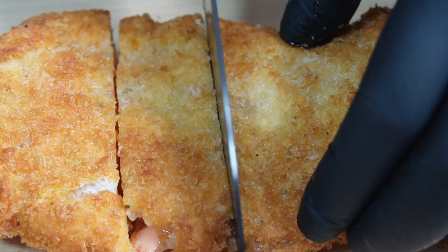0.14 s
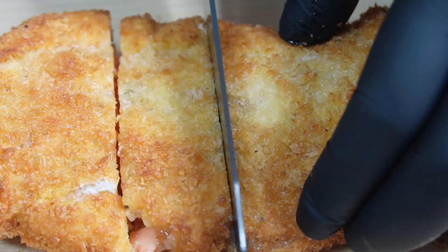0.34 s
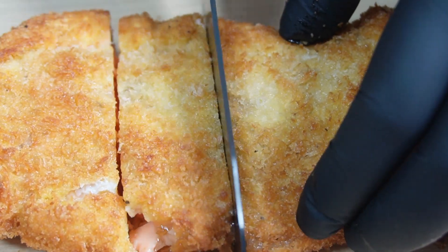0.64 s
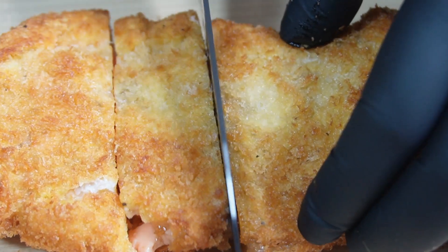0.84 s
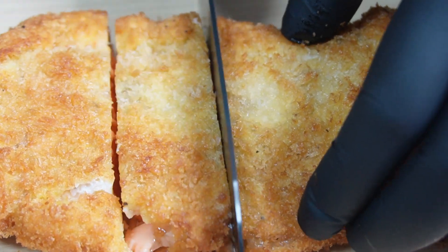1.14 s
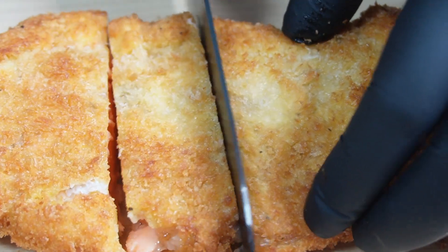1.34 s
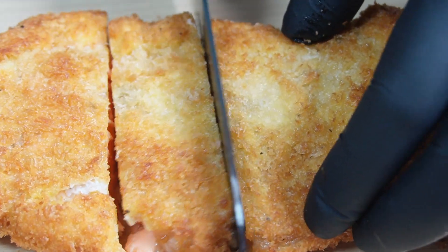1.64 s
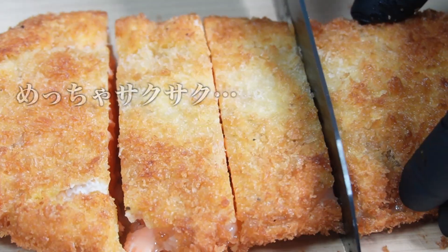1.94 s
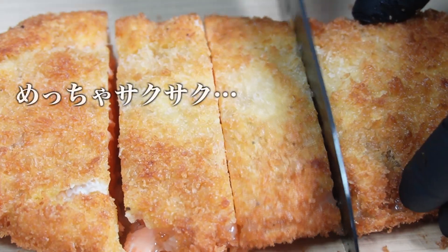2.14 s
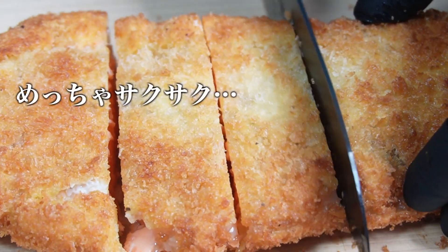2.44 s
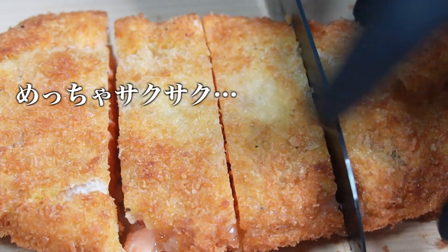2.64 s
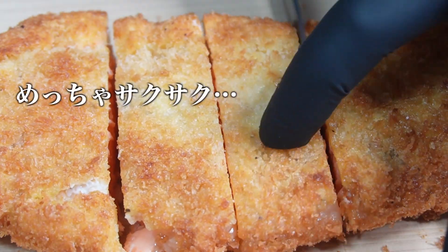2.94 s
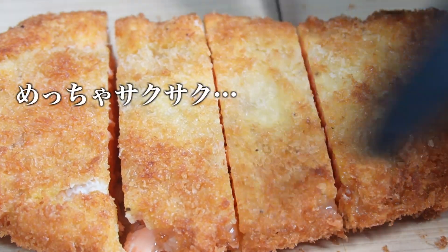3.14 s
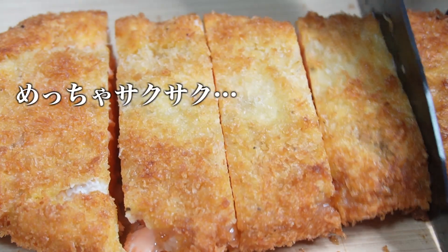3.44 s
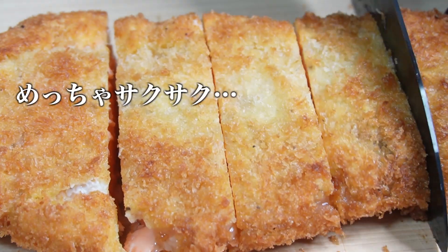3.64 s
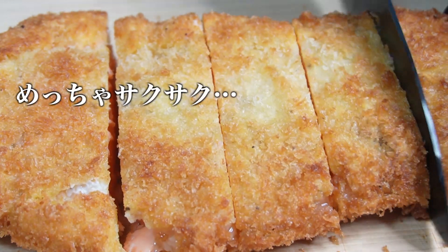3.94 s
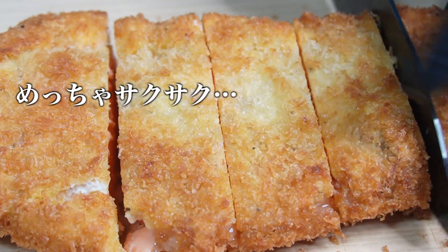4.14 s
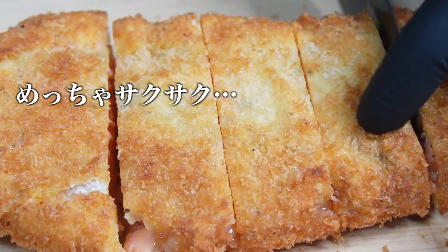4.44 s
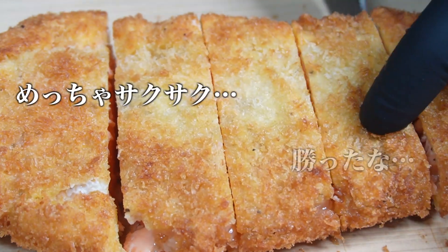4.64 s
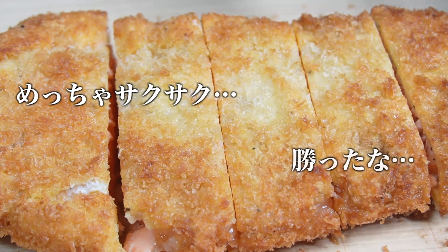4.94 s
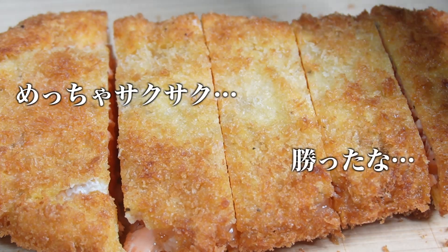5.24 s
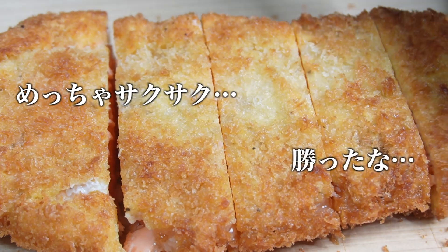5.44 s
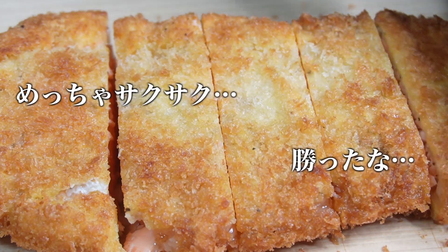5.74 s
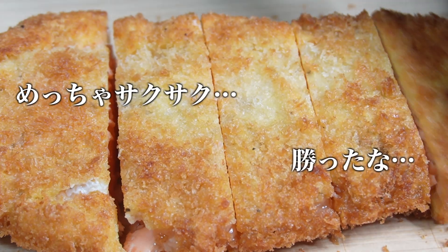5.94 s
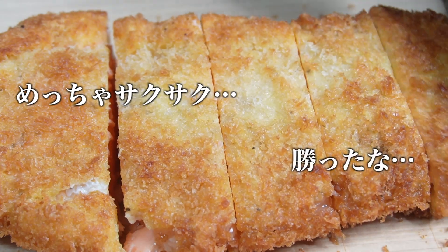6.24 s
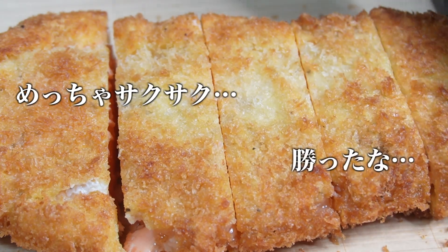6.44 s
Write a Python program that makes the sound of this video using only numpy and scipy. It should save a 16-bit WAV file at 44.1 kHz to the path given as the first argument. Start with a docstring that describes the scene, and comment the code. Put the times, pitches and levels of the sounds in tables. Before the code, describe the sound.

Very close in a quiet kitchen, a knife saws through a crunchy fried cutlet. Uneven strokes burst into dense crumb crackle with sharp flake snaps and light knocks on the board. The blade grates as it is drawn out, a piece slides softly, then more crunches follow, another long scrape, a soft slide, and brighter, drier crackling cuts at the end over faint low room noise.

```python
"""In a quiet kitchen, a knife saws three slices off a crisp breaded cutlet on a cutting board, close by.
Each stroke is a swarm of random crumb cracks, with short damped tones for the loud snaps of the crust.
Between bites the blade glides on smooth grit noise; its landings ring the board's own tones. The drawn
blade grates over the board, the pieces slide with soft rubbing noise, and the crust crunches again.
A short room answer and steady background noise lie around it all."""
import sys
import numpy as np
from scipy import signal
from scipy.fft import rfft, irfft, next_fast_len
from scipy.io import wavfile
from scipy.ndimage import map_coordinates

SR = 44100
rng = np.random.default_rng(int(sys.argv[2]) if len(sys.argv) > 2 else 0)


def master(y):
    """Save y as 16-bit WAV."""
    cut = np.clip(np.atleast_2d(y).T, -1, 1)
    pcm = np.round(cut * 32767)  # scale
    wavfile.write(sys.argv[1], SR, pcm.astype(np.int16))


N = 290619  # length of the scene in samples

# In bites and pulls, body is the dull part of the sound against its crisp part.
# the blade bites through the crust; time is when the crust gives way:
# (time [s], rise [s], hold [s], fall [s], crunch level [dB], body [dB])
BITES = [ (.175, 0.01, 0.0036, 0.015, -42.5, -3), (.222, 0.074, 0.1, 0.026, -37.5, -3),
         (.555, .003, .003, 0.028, -49, -8), (.622, 0.057, 0.03, 0.041, -32, -2.5),
         (.975, 0.13, 0.041, 0.053, -32, 1), (1.151, 0.08, 0.06, 0.041, -37, -2),
         (1.3, 0.13, 0.051, 0.062, -45, -5.5), (1.615, 0.035, 0.045, 0.02, -45, 0),
         (1.85, 0.11, 0.044, 0.065, -36, -4.5), (2.156, 0.03, 0.038, 0.056, -31, -4.5),
         (2.322, 0.023, 0.023, 0.0097, -52, 1), (2.392, 0.039, 0.013, 0.057, -40, -1),
         (2.523, 0.031, 0.022, 0.043, -41, -7.5), (2.66, .005, 0.0042, 0.014, -53.5, 8.5),
         (3.32, .016, 0.0085, 0.034, -36.5, -1), (3.34, 0.018, 0.052, 0.057, -42, -3),
         (3.48, 0.24, 0.068, 0.055, -48.5, -1.5), (3.585, 0.034, 0.061, 0.033, -42, -1),
         (3.635, 0.032, .035, .015, -40.5, -7), (3.914, 0.034, .036, 0.15, -31, -3),
         (4.034, .06, 0.033, .012, -36.5, -20), (4.14, .004, 0.009, 0.028, -51, 3),
         (4.177, 0.014, 0.019, 0.027, -53.5, 4.5)]
# shallower bites at the dry end of the cutlet: same columns
DRY_BITES = [ (5.335, 0.02, 0.0035, 0.045, -48.5, -8), (5.43, 0.17, 0.039, 0.012, -52, -3.5),
             (5.512, 0.0086, 0.013, 0.037, -44.5, -5), (5.56, 0.12, 0.17, 0.04, -42.5, -9.5),
             (5.7, 0.026, 0.061, 0.02, -43.5, -4), (5.795, .02, 0.047, 0.064, -49, -8),
             (5.978, 0.081, 0.051, 0.062, -38.5, -9), (6.115, .04, 0.037, 0.11, -50.5, -10),
             (6.281, 0.066, 0.018, 0.038, -34, -7), (6.4, .08, 0.032, 0.054, -56.5, -2.5),
             (6.548, 0.048, 0.033, .05, -39, -3.5)]
# between bites the blade leans on the crust, which keeps crackling: (start [s], length [s], level [dB])
LEANS = [(0, 0.12, -55), (.34, 0.15, -58), (0.563, 0.84, -56.5), (1.508, 0.074, -64.5), (1.572, 0.21, -53),
         (1.95, 0.43, -55.5), (2.47, 0.166, -55), (2.679, 0.084, -49.5), (3.686, 0.13, -56),
         (3.856, 0.16, -61), (4.22, 0.18, -53.5)]
# the same at the dry end: same columns
DRY_LEANS = [(5.34, 0.12, -55.5), (5.52, 0.51, -57), (6.22, .21, -61.5), (6.492, .09, -51.5)]
# the blade glides in the cut without biting: (start [s], end [s], level [dB], blade ring [dB])
GLIDES = [(0, 0.114, -48, -29), (0.382, .535, -51.5, 7), (0.435, .452, -52, 22), (0.763, 0.868, -49.5, 16),
          (2.907, 2.943, -43, 15), (4.422, 4.516, -44.5, 12)]
# large flakes of crust snap: (time [s], peak level [dB], pitch [Hz])
FLAKES = [(0.0179, -26, 6400), (0.1759, -25, 3700), (0.2544, -17, 6000), (0.6247, -17, 5600),
          (0.6962, -26, 5500), (1.0092, -13, 4000), (1.0472, -20, 6100), (1.114, -28, 3100),
          (1.1523, -20, 5100), (1.1637, -17, 4600), (1.1823, -15, 4500), (1.1991, -19, 3900),
          (1.2163, -18, 4100), (1.302, -22, 5200), (1.322, -21, 5000), (1.3523, -26, 4600),
          (1.615, -24, 6200), (1.6541, -24, 4800), (1.9421, -24, 5600), (2.1209, -26, 3300),
          (2.1336, -21, 4500), (2.144, -20, 4400), (2.321, -28, 6000), (2.3936, -22, 3000),
          (2.5227, -20, 6300), (2.6607, -26, 4500), (2.7165, -27, 5300), (2.7408, -26, 6300),
          (2.7871, -20, 4900), (2.8629, -24, 5700), (3.0818, -25, 5700), (3.312, -23, 4500),
          (3.3213, -18, 4400), (3.4898, -24, 3900), (3.6369, -19, 4900), (3.6715, -23, 4900),
          (3.8886, -26, 4700), (3.9112, -15, 3800), (3.9377, -12, 4700), (3.9967, -21, 4400),
          (4.0071, -19, 5900), (4.1397, -26, 5100), (4.1491, -23, 4300), (4.1935, -26, 3200),
          (4.4119, -23, 4000), (4.7532, -20, 5500), (4.7644, -22, 5600), (5.3351, -27, 5100),
          (5.519, -20, 4400), (5.6993, -13, 4500), (5.7958, -26, 5700), (5.9649, -9, 5600),
          (5.981, -15, 6100), (6.0184, -18, 5700), (6.0301, -20, 4600), (6.1176, -26, 4000),
          (6.282, -14, 6600), (6.5488, -17, 4500), (6.5623, -15, 4300)]
# the edge meets the board; all levels are later shifted together:
# (time [s], level [dB], centre of the knock [Hz])
LANDINGS = [(0.184, -32.5, 540), (0.374, -35, 590), (2.525, -45, 420), (2.716, -45, 460),
            (3.082, -38.5, 324), (3.32, -33.5, 546), (4.762, -38.5, 324), (6.298, -30.5, 710)]
# the blade drawn out along the board; time is when it reaches full speed; the body is later trimmed:
# (time [s], rise [s], hold [s], fall [s], scrape level [dB], body [dB])
PULLS = [(2.8, 0.046, 0.27, 0.12, -45.5, -5), (3.168, 0.02, 0.0073, 0.027, -48, -12),
         (4.43, 0.36, 0.21, 0.34, -45, -5.5), (4.76, 0.069, 0.057, 0.064, -50, 0),
         (4.87, 0.025, 0.0065, .05, -48, -30)]
# how firmly the drawn edge bears on the board: (time [s], contact [1 = firm])
CONTACT = [(2.78, 0.17), (2.95, 0.42), (3.07, 0.51), (3.139, 0.24), (4.36, 0.074), (4.469, 0.7),
           (4.6, 0.79), (4.82, 0.44), (4.89, 0.16)]
# a cut piece slides; time is when it reaches full speed:
# (time [s], rise [s], hold [s], fall [s], level [dB])
SLIDES = [(3.198, .05, 0.031, .3, -61), (4.928, .1, 0.071, .3, -66), (5.119, 0.21, 0.05, 0.23, -54)]

# tones of the board, weighted afresh for each knock: (pitch [Hz], level [dB], time to fall 60 dB [s])
BOARD_MODES = [(137, -12, .075), (238, 14, 0.032), (394, 23, 0.012), (514, -30, 0.068), (540, 9.5, 0.051),
               (710, 15.5, 0.056), (884, 27.5, 0.041)]
# resonances of the blade inside the cutlet: (pitch [Hz], width [Hz], level [dB])
BLADE_INSIDE = [(1143, 320, 11), (1760, 136, 3.5), (2200, 85, 0.5), (3916, 52, 4.5), (5070, 500, -10)]
# the flat of the blade rubbed by the cut face; the ring of each glide is added to the level:
# (pitch [Hz], width [Hz], level [dB])
BLADE_FACE = [(1930, 160, -3), (2240, 82, 0)]
# resonances of the blade against the board: (pitch [Hz], width [Hz], level [dB])
BLADE_ON_BOARD = [(745, 43, -17), (818, 56, 19), (1220, 27, -0.5), (1660, 46, 8.5), (2295, 35, -7.5)]

# Tone colours, giving shape but not loudness.
# crumbs breaking: (frequency [Hz], level [dB])
CRUMBS = [(60, -28), (200, -13), (430, -22.5), (650, -4.5), (1100, -12.5), (1550, -7.5), (2100, 1.5),
          (3300, 2.5), (4500, 4), (7000, 5), (10000, -3.5), (16000, -21.5)]
# crumbs at the dry end: (frequency [Hz], level [dB])
DRY_END = [(60, -30.5), (200, -10), (500, -22.5), (720, -8), (1400, -9.5), (2100, -3.5), (4000, -0.5),
           (6500, -3), (10000, -9.5), (16000, -26)]
# crumbs grating under the drawn blade: (frequency [Hz], level [dB])
GRATING = [(150, -69), (450, -27), (700, -7), (1400, -8.5), (2300, -4), (3500, -2.5), (6000, 3),
           (8000, -1.5), (11000, -11.5), (16000, -26)]
# smooth rubbing of blade or piece: (frequency [Hz], level [dB])
RUBBING = [(500, -26), (1500, -18), (2400, -8), (4000, -6.5), (6200, -8), (8000, -15.5), (16000, -33)]
# snapping flakes: (frequency [Hz], level [dB])
FLAKE_TONE = [(100, -34), (400, -9), (900, -9), (2000, -5.5), (6500, -4), (9500, -9), (12000, -11.5),
              (16000, -10.5)]
# background noise of the room: (frequency [Hz], level [dB])
BACKGROUND = [(20, -47), (50, -17), (90, -12), (130, -3.5), (168, 0), (200, 0), (255, 1), (400, -3.5),
              (600, -7.5), (1300, -16), (5000, -13), (16000, -32)]
# how long the room answers: (frequency [Hz], time to fall 60 dB [s])
ROOM_T60 = [(200, 0.9), (2000, 0.12), (10000, 0.15)]

TOP_HZ = 16000  # nothing is kept from here up
EDGE_DB = 22.5  # a stroke swells by this much over its rise and dies by this much over its fall
LEAN_RISE_S, LEAN_FALL_S, LEAN_BODY_DB = 0.012, 0.062, -7.5
# small flakes drop off at random during a lean, and peak well over its crackle
CHIPS_PER_S, CHIP_OVER_DB, CHIP_SPREAD_DB = 6.9, 20.5, 7
CHIP_HZ, CHIP_OCTAVES = 5830, 0.31  # middle pitch and its random spread


def amp(db):
    """Turn decibels into a gain."""
    return 10 ** (np.asarray(db) / 20)


def unit(x):
    """Scale a sound to an average (rms) strength of 1."""
    return x / np.sqrt(np.mean(x ** 2) + 1e-20)


def along(points, hz):
    """Read (frequency, value) points at any frequency, on a log axis."""
    point_hz, values = np.transpose(points)
    return np.interp(np.log(hz + 1), np.log(point_hz + 1), values)


def filtered(x, response):
    """Multiply each frequency of a sound by a response."""
    size = next_fast_len(N + SR // 2)
    hz = np.fft.rfftfreq(size, 1 / SR)
    return irfft(rfft(x, size) * response(hz), size)[:N]


def causal(gain):
    """Give this gain a timing that never sounds before its cause (minimum phase)."""
    cepstrum = irfft(np.log(np.maximum(gain, 1e-6)))
    half = len(cepstrum) // 2
    cepstrum[1:half] *= 2
    cepstrum[half + 1:] = 0
    return np.exp(rfft(cepstrum))


def resonances(modes, hz):
    """Sum the responses of (pitch, width, level) resonances."""
    return sum(amp(db) * 1j * hz * width / (centre ** 2 - hz ** 2 + 1j * hz * width)
               for centre, width, db in modes)


def wander(rate):
    """A smooth random curve through `rate` random points a second."""
    points = rng.standard_normal(int(N * rate / SR) + 4)
    return map_coordinates(points, [np.arange(N) * rate / SR])


def reflected(x, share, delay_s=0.00172, drift=0.088, absorb_hz=3500):
    """Add a close echo with its treble absorbed; its path changes as the knife moves, shifting its peaks."""
    delay = delay_s * SR * np.exp(drift * wander(5))  # samples
    echo = filtered(x, lambda hz: 1 / (1 + (hz / absorb_hz) ** 4))
    return x + share * map_coordinates(echo, [np.arange(N) - delay])


def swell(s, rise_s, hold_s, fall_s, db, give_db=0):
    """Power of one stroke: it swells, jumps by give_db as the crust gives way, holds and dies."""
    t = np.arange(N) / SR - s
    before = np.maximum(-t / max(rise_s, 1e-3), 0)
    after = np.maximum((t - hold_s) / max(fall_s, 1e-3), 0)
    drop_db = np.minimum(EDGE_DB * (before + after), 100)
    return amp(db - give_db * (t < 0) - drop_db) ** 2


def effort(strokes, leans=(), give_db=0):
    """Crisp level and body in dB at each sample; overlapping strokes add their power."""
    lean_strokes = [(s, LEAN_RISE_S, length, LEAN_FALL_S, db, LEAN_BODY_DB) for s, length, db in leans]
    crisp, dull = np.zeros(N), np.zeros(N)
    for *shape, body_db in list(strokes) + lean_strokes:
        power = swell(*shape, give_db=give_db)
        crisp += power
        dull += power * amp(body_db) ** 2
    return 10 * np.log10(crisp), 10 * np.log10(dull / crisp)


def fractures(rate, spread_db, ring_s, rattle, count=4, size=2048):
    """Crumbs break at random, rate a second; each patch of crust has a few crack shapes of its own."""
    t = np.arange(SR // 100) / SR
    breaks = rng.random(N) < rate / SR
    strengths = amp(spread_db * np.minimum(rng.standard_normal(N), 2))
    cracks = breaks * strengths * rng.choice([-1, 1], N)
    kinds = rng.integers(count, size=N) == np.arange(count)[:, None]
    out = np.zeros(N + len(t))
    for start in range(0, N, size):
        # a spike, then a short rattle of the broken cell
        shapes = rng.standard_normal((count, len(t))) * np.exp(-t / ring_s)
        shapes *= rattle / np.linalg.norm(shapes, axis=1, keepdims=True)
        shapes[:, 0] += 1
        here = slice(start, start + size)
        patch = signal.fftconvolve(cracks[here] * kinds[:, here], shapes, axes=1).sum(axis=0)
        out[start:][:len(patch)] += patch
    return out[:N]


def voiced(cracks, colour, db, body_db, even_s, split_hz=2800):
    """Cracks through a body: the hand sets the energy they release, the depth of the bite their dull part."""
    sound = filtered(cracks, lambda hz: causal(colour(hz)))
    crisp = filtered(sound, lambda hz: 1 - 1 / (1 + (hz / split_hz) ** 4))
    dull = sound - crisp
    # even out the running power, so that the level follows db
    window = signal.windows.hann(int(even_s * SR) + 3)
    power = np.abs(signal.oaconvolve(unit(crisp) ** 2, window / window.sum(), "same"))
    force = amp(db) / np.std(crisp) / np.sqrt(power + 1e-3)
    return force * (crisp + amp(body_db) * dull)


def body_of(colour, split_hz=2800):
    """A tone colour's own dull part against its crisp part, in dB."""
    hz = np.arange(500, TOP_HZ)
    power = colour(hz) ** 2
    return 10 * np.log10(power[hz < split_hz].sum() / power[hz >= split_hz].sum())


def room_tone():
    """Low, steady background noise of the room: coloured random noise."""
    noise = rng.standard_normal(N)
    return amp(-62) * unit(filtered(noise, lambda hz: amp(along(BACKGROUND, hz))))


def cutting():
    """The harder the stroke, the more crumbs break each second; the blade colours them."""
    db, body_db = effort(BITES, LEANS, give_db=4)
    cracks = fractures(rate=3600 * amp(db + 40), spread_db=8, ring_s=0.0008, rattle=0.65)
    colour = lambda hz: amp(along(CRUMBS, hz)) * np.abs(1 + resonances(BLADE_INSIDE, hz))
    return voiced(reflected(cracks, share=0.25), colour, db, body_db - body_of(colour), even_s=0.063)


def gliding():
    """Between bites the flat of the blade rubs smoothly along the cut face, louder at higher speed."""
    t = np.arange(N) / SR
    grit = fractures(rate=10000, spread_db=0.0, ring_s=0.0054, rattle=1.7)
    out = np.zeros(N)
    for start, end, db, ring_db in GLIDES:
        colour = lambda hz: amp(along(RUBBING, hz)) * (1 + amp(ring_db) * resonances(BLADE_FACE, hz))
        progress = np.clip((t - start) / (end - start), 0, 1)
        speed = np.abs(np.sin(np.pi * progress))
        out += amp(db) * speed ** 0.52 * unit(filtered(grit, colour))
    return out


def room(x):
    """The kitchen's short answer: fading noise, its bass lasting longest."""
    hz, t, noise = signal.stft(rng.standard_normal(SR // 3), SR, nperseg=256)
    fade = amp(-60 * t / along(ROOM_T60, hz)[:, None])
    tail = signal.istft(noise * fade, SR, nperseg=256)[1]
    late = np.pad(x, (SR // 250, 0))  # the answer starts 4 ms later
    return signal.fftconvolve(late, tail / np.linalg.norm(tail))[:N]


def chips(count=200):
    """Random small flakes as (time, peak level, pitch); a harder lean breaks off larger ones."""
    times = np.cumsum(rng.exponential(size=count)) / CHIPS_PER_S
    found = []
    for s, (size, pitch) in zip(times, rng.standard_normal((count, 2))):
        for start, length, db in list(LEANS) + list(DRY_LEANS):
            if start < s < min(start + length, N / SR):
                peak_db = db + CHIP_OVER_DB + CHIP_SPREAD_DB * size
                found.append((s, peak_db, CHIP_HZ * 2 ** (CHIP_OCTAVES * pitch)))
    return found


def flakes(cycles=0.62, splinter=0.25, splinter_s=0.0013):
    """A flake breaks with a quickly damped tone, and splinters for a few milliseconds."""
    t = np.arange(1024) / SR
    colour = causal(amp(along(FLAKE_TONE, np.fft.rfftfreq(len(t), 1 / SR))))
    out = np.zeros(N + len(t))
    for s, db, hz in list(FLAKES) + chips():
        # one main push, then sparse weaker ones
        push = splinter * rng.standard_normal(len(t)) * (rng.random(len(t)) < 0.3) * np.exp(-t / splinter_s)
        push[0] = 1
        flake = np.cos(2 * np.pi * hz * t) * np.exp(-t * hz / cycles)
        snap = irfft(rfft(push) * rfft(flake) * colour)
        out[round(s * SR):][:len(t)] += amp(db) * snap / np.abs(snap).max()
    return out[:N]


def board_knocks(octaves=0.32, gain_db=-4.0):
    """Each landing of the edge rings the board's tones, strongest around the knock's own centre."""
    t = np.arange(SR // 5) / SR
    attack = 1 - np.exp(-t / 0.002)
    out = np.zeros(N + len(t))
    for s, db, centre_hz in LANDINGS:
        ring = np.zeros(len(t))
        for hz, level, t60 in BOARD_MODES:
            closeness = np.exp(-0.5 * (np.log2(hz / centre_hz) / octaves) ** 2)
            tone = np.sin(2 * np.pi * (hz * t + rng.random()))
            ring += amp(level - 60 * t / t60) * closeness * tone
        ring *= attack
        out[round(s * SR):][:len(t)] += amp(db + gain_db) * ring / np.abs(ring).max()
    return out[:N]


def drifting(ring, depth=0.0253, rate=9):
    """The blade's resonances drift by a few percent as the point of contact travels."""
    return map_coordinates(ring, [np.arange(N) + depth * SR / rate * wander(rate)])


def drawing():
    """Fine crumbs grate under the blade; it rings only while its edge bears on the board."""
    db, body_db = effort(PULLS)
    crumbs = fractures(rate=8700, spread_db=7.0, ring_s=0.00049, rattle=0.9)
    cracks = reflected(crumbs, share=0.48)
    contact = np.interp(np.arange(N) / SR, *np.transpose(CONTACT))
    ring = drifting(filtered(cracks, lambda hz: resonances(BLADE_ON_BOARD, hz)))
    colour = lambda hz: amp(along(GRATING, hz))
    return voiced(cracks + contact * ring, colour, db, body_db - body_of(colour) - 2.5, even_s=0.077)


def sliding():
    """A piece rubs softly over the board: dense, tiny cracks blur into noise."""
    level = np.sqrt(sum(swell(*slide) for slide in SLIDES))
    grit = fractures(rate=16000, spread_db=4.5, ring_s=0.0036, rattle=2.1)
    return level * unit(filtered(grit, lambda hz: amp(along(RUBBING, hz))))


def last_crunches():
    """The dry end of the cutlet gives way in brighter cracks, more of them in harder strokes."""
    db, body_db = effort(DRY_BITES, DRY_LEANS, give_db=2.5)
    cracks = fractures(rate=4200 * amp(0.7 * (db + 40)), spread_db=8.2, ring_s=0.0008, rattle=0.6)
    colour = lambda hz: amp(along(DRY_END, hz))
    return voiced(reflected(cracks, share=0.36), colour, db, body_db - body_of(colour), even_s=0.038)


def scene():
    """Knife, cutlet and board close by, in a quiet kitchen."""
    knife = cutting() + gliding() + drawing() + last_crunches()
    near = knife + flakes() + board_knocks() + sliding()
    return (near + amp(-14.0) * room(near) + room_tone())[None]


def record(dry):
    """The recorder keeps nothing above its band limit."""
    return np.array([filtered(channel, lambda hz: hz < TOP_HZ) for channel in dry])


dry = scene()
out = record(dry)
master(out)
```